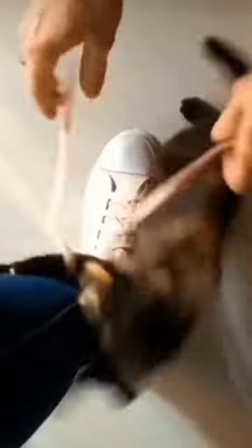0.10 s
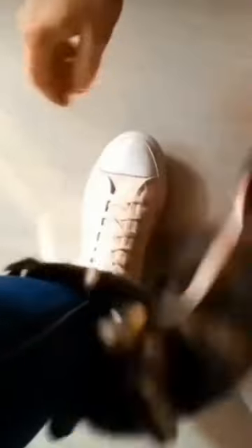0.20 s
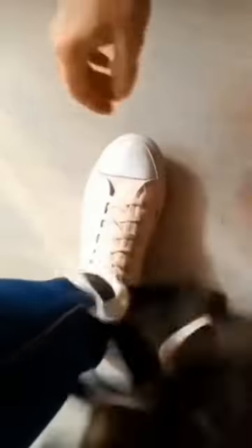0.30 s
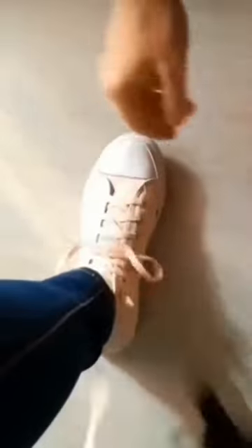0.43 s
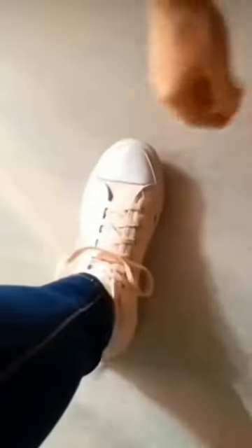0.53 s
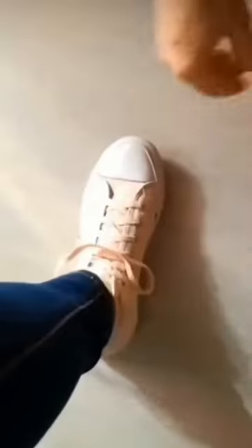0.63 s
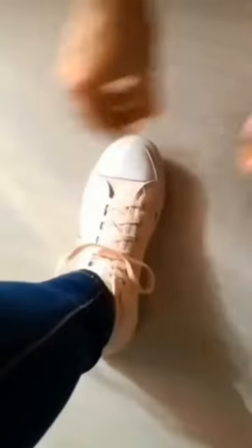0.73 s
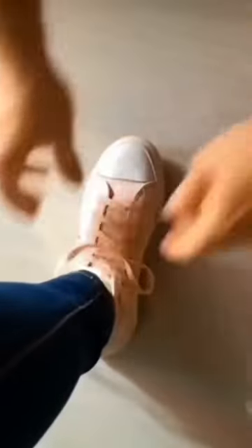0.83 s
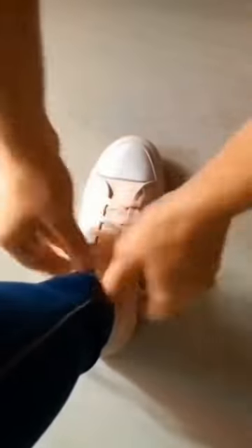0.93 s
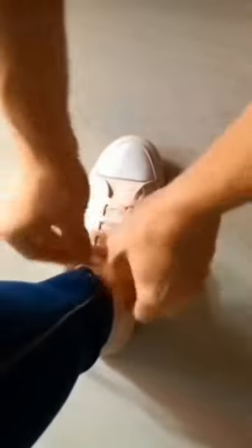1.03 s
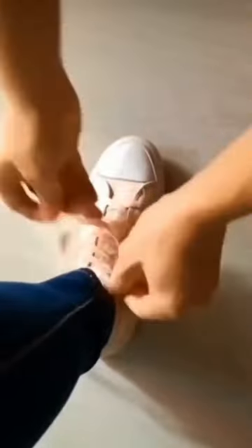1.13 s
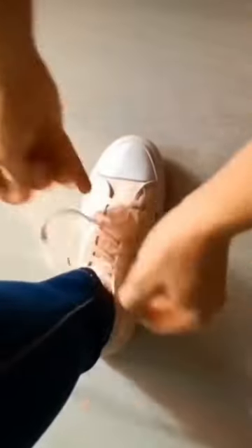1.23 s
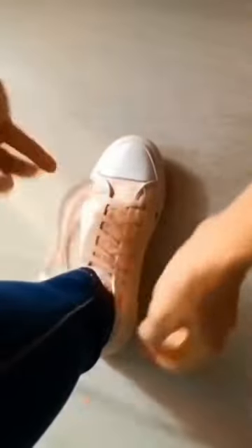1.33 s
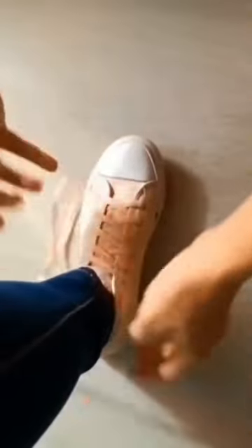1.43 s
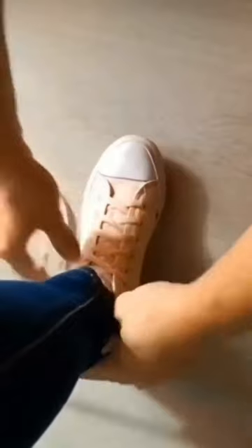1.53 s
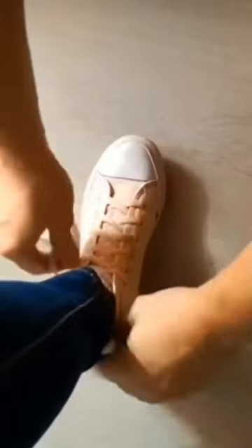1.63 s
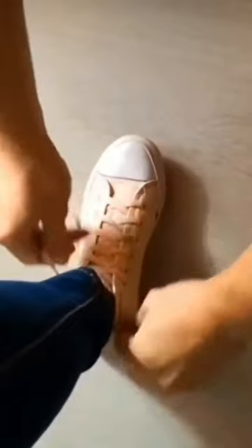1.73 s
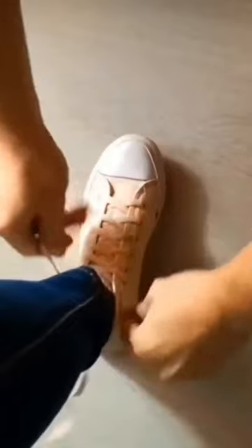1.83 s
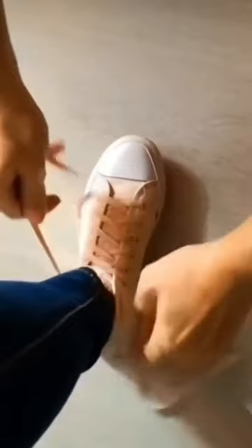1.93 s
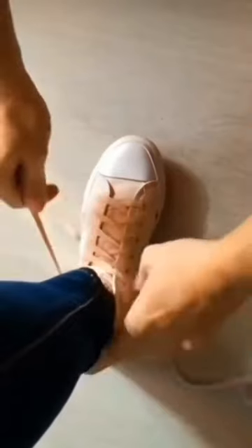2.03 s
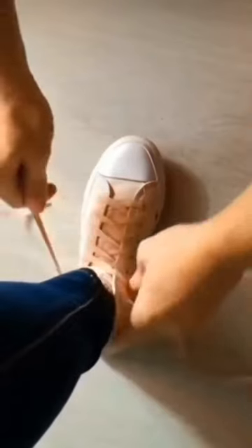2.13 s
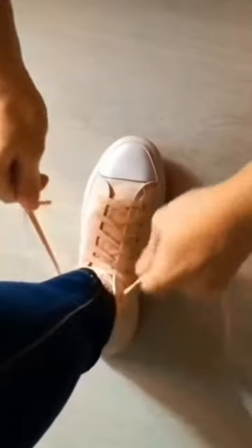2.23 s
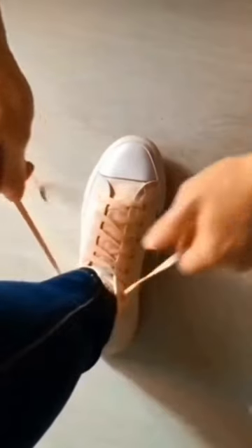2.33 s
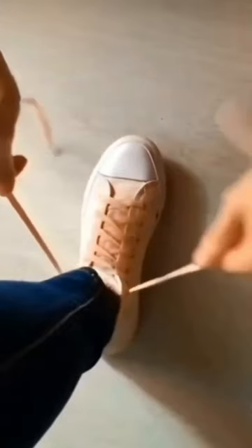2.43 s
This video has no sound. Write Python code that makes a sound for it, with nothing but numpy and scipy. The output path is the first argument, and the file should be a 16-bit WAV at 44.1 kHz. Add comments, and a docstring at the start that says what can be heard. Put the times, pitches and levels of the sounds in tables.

```python
"""First a low room rumble, a soft cloth rustle and a light rub; then hands work the laces of a canvas shoe.
It stands on a hard floor, close to the microphone. Rubs and scuffs are grainy clicks over hiss, shaped by filters.
Where they stick and slip they groan or squeak, as short wandering tones. Hollow knocks are damped resonances.
Near echoes and a small room's tail surround the shoe; the treble is dulled and the loudest peaks are clipped flat.
"""
import sys
import numpy as np
from scipy import signal
from scipy.fft import rfft, irfft
from scipy.io import wavfile

SR = 44100
rng = np.random.default_rng(int(sys.argv[2]) if len(sys.argv) > 2 else 0)


def wrap_up_sound(samples):
    """Save the sound to the file named by the first command line argument, as 16-bit audio."""
    columns = np.atleast_2d(samples).T
    # keep every value between -1 and 1, then stretch to whole-number steps
    tamed = np.clip(columns, -1, 1)
    steps = np.round(tamed * 32767).astype(np.int16)
    wavfile.write(sys.argv[1], SR, steps)


N = 110250   # samples: 2.5 s
TIME = np.arange(N) / SR
FREQS = np.maximum(np.arange(N // 2 + 1) * SR / N, 1)

# trouser leg, spectrum of the cloth: (frequency [Hz], level per Hz [dB])
CLOTH_SPECTRUM = [(100, -8.5), (200, 0.5), (400, -1.5), (520, -9), (1000, -12.5), (3000, -46)]
# trouser leg, its one movement: (start [s], rise [s], hold [s], release to -20 dB [s])
CLOTH_MOVE = (-.05, 0.0997, 0.7234, 0.142)
# rubs of lace and cloth; the release brings a fall of 20 dB, a negative pan leans right:
# (start [s], rise [s], hold [s], release [s], level [dB], low edge [Hz], high edge [Hz], pan [dB])
RUBS = [(-.04, 0.139, 0.088, 0.13, -23, 987, 5840, -8), (.208, 0.0104, 0.082, 0.0054, -18, 670, 5500, -5),
        (.306, 0.0202, 0.1128, .1, -5.5, 702, 6220, -2),
        (0.481, 0.0031, 0.0213, .12, -5.5, 950, 5920, -1.5),
        (0.554, 0.0145, 0.0285, 0.06, -12, 1870, 8800, -1),
        (.60, 0.0302, 0.1238, 0.0629, -20.5, 882, 6530, -1),
        (0.992, 0.0562, 0.0312, 0.1951, -28, 2665, 6500, -5.5),
        (1.119, 0.0992, 0.0696, 0.1277, -22, 1100, 6860, -6.5),
        (1.307, 0.0587, .02, .22, -25, 2880, 6920, -5),
        (1.576, 0.0051, 0.0256, 0.3051, -20.5, 1392, 2110, -3),
        (1.573, 0.0079, 0.084, 0.1949, -22.5, 3100, 6500, -1),
        (1.689, 0.049, 0.054, 0.2279, -21.2, 1500, 6130, -3),
        (1.927, 0.0098, .016, 0.18, -21.5, 2380, 6960, -3),
        (1.947, 0.0065, 0.0392, 0.107, -10, 2696, 7800, -2.5),
        (1.95, 0.0077, 0.0459, 0.1464, -20, 399, 2010, -0.5),
        (2.08, .17, .04, 0.1598, -21.8, 1600, 5000, -5), (2.333, 0.126, .06, 1.46, -31.5, 3360, 8550, -4.5)]
# spectrum of the rubs before their edges are cut: (frequency [Hz], level per Hz [dB])
RUB_SPECTRUM = [(150, -7.5), (500, -2.5), (1000, -0.5), (1800, 1.5), (3200, 0), (5000, 0.83), (7000, -3.5),
                (8500, -5), (10000, -7.5)]
# edges between the bands of friction that flutter on their own: (frequency [Hz])
FLUTTER_EDGES = (600, 1300, 2400, 4000, 6500)
# side against mid, how wide the sound is: (frequency [Hz], level [dB])
SIDE_LEVEL = [(100, -12.5), (300, -8), (600, -4), (1500, -7.5), (2500, -4.5), (5200, -.5), (7000, -3),
              (9000, -5.5)]
# spectrum of the room rumble: (frequency [Hz], level per Hz [dB])
RUMBLE_SPECTRUM = [(20, -3), (50, -2.5), (68, -6), (88, 4.5), (115, -7), (200, -9), (350, -17), (700, -26),
                   (1800, -21), (5000, -28), (9000, -36.5)]
# loudness of the rumble over time: (time [s], level [dB])
RUMBLE_LEVEL = [(0, -29), (.3, -27.5), (.72, -28), (.9, -35), (1.05, -35.5), (1.35, -33.5), (1.85, -31.5),
                (2.22, -38.5), (2.45, -32.5)]
# knocks of fingers and lace tips on the shoe: (time [s], peak level [dB], pitch [Hz], skid decay [s])
KNOCK_HITS = [(.111, -16.5, 1500, .005), (.2022, 2, 1800, 0.00227), (.2035, -7, 900, .006),
              (.318, -6, 818, 0.0045), (.384, -3, 951, 0.00385), (.482, 1.5, 1300, .007),
              (.482, -7, 331.7, 0.0059), (1.2078, -11.5, 720, .005), (1.213, -25, 1600, .03),
              (1.579, -16, 1600, 0.0058), (1.763, -17, 3900, .002), (1.9485, -9, 700, 0.0018),
              (1.949, -6, 1378, .002)]
# groans and squeaks where a rub sticks and slips; roughness is the pitch scatter as a share:
# (start [s], length [s], level [dB], pitch [Hz], roughness [0-1])
STICK_SLIPS = [(.212, .016, -20, 1720, .18), (0.381, .029, -9.5, 775, .05), (.427, .011, -10.5, 3000, .15),
               (0.493, .008, -4.5, 1006, .06), (0.514, 0.0401, -14, 965.1, .06),
               (.519, 0.0202, -16, 264.2, .1), (1.21, .04, -24.5, 750, .09),
               (1.322, 0.0408, -35, 860, 0.11), (1.572, .04, -23.5, 1750, .16),
               (1.803, 0.0434, -37, 780, .15), (1.929, .012, -20, 640, .17),
               (1.951, 0.00596, -4.5, 4686, 0.04)]
# scuffs that drive the hollow of the shoe; the release brings a fall of 20 dB:
# (start [s], rise [s], hold [s], release [s], level [dB])
SCUFF_PUSHES = [(0.317, 0.0041, 0.055, 0.1285, -16), (.376, 0.0088, 0.0376, 0.1337, -10),
                (.481, 0.00304, 0.0148, 0.1406, -6.5), (2.179, 0.064, 0.058, 0.26, -39.5)]
# spectrum of the hollow canvas shell: (frequency [Hz], level per Hz [dB])
SHELL_SPECTRUM = [(100, -10), (180, -4), (260, 0.5), (370, -7.5), (520, -9), (780, 1.5), (1000, 2),
                  (1300, -3), (2200, -9.5), (4000, -23), (9000, -43)]

CLOTH_DB = -31.5
RUB_LEAK_DB, SAG_DB_PER_S = -11, 11.5   # fibre noise below the low edge; a stroke slows as it goes
GRAINS_PER_S, GRAIN_SPREAD_DB, SMOOTH_DB = 1400, 3.5, -4   # clicks, their uneven size, the hiss with them
FLUTTER_DB, FLUTTER_HZ = 2, 45   # depth and fastest rate
ECHO_SPAN_S, ECHO_DB = .012, 4   # floor, leg and hands close by
PAN_DB_PER_OCTAVE, CENTRE_HZ = -2, 1100   # bright contacts lean to the right, dull ones to the left
RING_CYCLES = 13.2   # cycles to fall 60 dB: canvas damps fast
CONTACT_RISE_S, TAP_DB = 0.0013034, 15   # growth of the first brush; soft finger tap against the skid
# edges as a share of the pitch; a small spot radiates little below its resonance
KNOCK_LOW_RATIO, KNOCK_TOP_RATIO = 0.531, 1.45
SLIP_WANDER, SLIP_EDGE = 0.16023, 0.297   # wander rate as a share of pitch; rise and fall as a share of length
ROOM_T60_S, ROOM_DB, ROOM_DELAY_S = 0.306, -14.5, .01
DULL_ABOVE_HZ, FULL_SCALE, CUTOFF_HZ = 9976, 1.0, 15900   # full scale is the largest amplitude that passes


def from_db(db):
    """Turn decibels into a gain."""
    return 10 ** (np.asarray(db) / 20)


def rms_one(x):
    """Scale to an average strength (rms) of 1."""
    return x / np.sqrt(np.mean(x ** 2) + 1e-20)


def colour(x, points):
    """Shape a sound by a spectrum table."""
    hz, db = np.transpose(points)
    gain = from_db(np.interp(np.log(FREQS), np.log(hz), db))
    return irfft(rfft(x) * gain, N)


def cut(x, hz, kind, order=2):
    """Remove the lows ("high" pass) or the highs ("low" pass)."""
    sos = signal.butter(order, min(hz, SR * .45), kind, fs=SR, output="sos")
    return signal.sosfilt(sos, x)


def wander(hz):
    """Smooth random drift of spread 1, mostly slower than hz."""
    return rms_one(cut(rng.standard_normal(N), hz, "low"))


def panned(pan_db):
    """Left and right gains of unit mean power."""
    return rms_one(from_db([[pan_db / 2], [-pan_db / 2]]))


def placed(hz):
    """Left and right gains of a contact of this pitch."""
    return panned(PAN_DB_PER_OCTAVE * np.log2(hz / CENTRE_HZ))


def widen(pair):
    """Two unrelated sounds become mid and side; the bass is nearly alike on both sides."""
    mid, side = pair[0], colour(pair[1], SIDE_LEVEL)
    return mid + side * np.array([[1], [-1]])


def envelope(start, rise, hold, release):
    """A hand speeds up, slows a little, then lets go."""
    t = TIME - start
    speed_up = np.clip(t / max(rise, 1e-3), 0, 1)
    sag_db = SAG_DB_PER_S * np.maximum(t - rise, 0)
    release_db = 20 * np.maximum(t - rise - hold, 0) / release
    return speed_up * from_db(-sag_db - release_db)


def near_echoes(x, count=12):
    """Close surfaces send back short echoes that colour each of two sounds in its own way."""
    out = x.copy()
    echo_gain = from_db(ECHO_DB) / np.sqrt(count)
    for ch in range(2):
        for share, sign in zip(rng.uniform(.05, 1, count), rng.choice([-1, 1], count)):
            lag = 1 + int(share * ECHO_SPAN_S * SR)
            out[ch, lag:] += sign * echo_gain * x[ch, :-lag]
    return out


def friction():
    """Threads catch and slip: uneven clicks over a smooth hiss, changing colour with the grip."""
    catches = rng.random((2, N)) < GRAINS_PER_S / SR
    signs = rng.choice([-1, 1], (2, N))
    sizes = from_db(GRAIN_SPREAD_DB * np.minimum(rng.exponential(1, (2, N)), 5))
    hiss = from_db(SMOOTH_DB) * rng.standard_normal((2, N))
    grain = rfft(near_echoes(rms_one(catches * signs * sizes) + hiss))
    band, out = np.searchsorted(FLUTTER_EDGES, FREQS), 0
    for k in range(len(FLUTTER_EDGES) + 1):
        flutter = from_db(FLUTTER_DB * wander(FLUTTER_HZ))
        out = out + irfft(grain * (band == k), N) * flutter
    return widen(out)


def trouser_leg():
    """Heavy cloth moves with a soft, low rustle of rubbing threads."""
    start, rise, hold, release = CLOTH_MOVE
    speed_up = np.clip((TIME - start) / rise, 0, 1)
    let_go = from_db(-20 * np.maximum(TIME - start - rise - hold, 0) / release)
    return from_db(CLOTH_DB) * speed_up * let_go * rms_one(colour(friction(), CLOTH_SPECTRUM))


def laces():
    """Each stroke sounds between its own edges: a firm grip is lower, a light slide is thinner."""
    rub, out = colour(friction(), RUB_SPECTRUM), 0
    for start, rise, hold, release, db, low_hz, high_hz, pan_db in RUBS:
        rub = np.roll(rub, SR // 2, axis=1)   # a fresh stretch of lace
        body = cut(rub, low_hz, "high", order=4)
        # played backwards, so that the leak does not match the body
        leak = from_db(RUB_LEAK_DB) * cut(rub[:, ::-1], low_hz / 2, "high", order=1)
        sound = rms_one(cut(body + leak, high_hz, "low", order=2))
        out = out + from_db(db) * panned(pan_db) * envelope(start, rise, hold, release) * sound
    return out


def rumble():
    """Low room noise with one boomy resonance and a faint hiss."""
    noise = colour(widen(rng.standard_normal((2, N))), RUMBLE_SPECTRUM)
    level = from_db(np.interp(TIME, *np.transpose(RUMBLE_LEVEL)))
    return level * rms_one(noise)


def knocks():
    """A brush, a soft tap and a dying skid drive one well-damped resonance of the spot that is hit."""
    out = 0
    for s, db, hz, skid_s in KNOCK_HITS:
        t = TIME - s - CONTACT_RISE_S   # zero at the tap
        force = rng.standard_normal(N) * np.exp(-np.abs(t) / np.where(t < 0, CONTACT_RISE_S, skid_s))
        force[int((s + CONTACT_RISE_S) * SR)] += from_db(TAP_DB)
        # two-pole resonator: r sets the damping, w the pitch
        r, w = from_db(-60 * hz / (RING_CYCLES * SR)), 2 * np.pi * hz / SR
        ring = signal.lfilter([1, 0, -1], [1, -2 * r * np.cos(w), r * r], force + 1e-18)
        ring = cut(ring, KNOCK_TOP_RATIO * hz, "low", order=4)
        ring = cut(ring, KNOCK_LOW_RATIO * hz, "high", order=3)
        out = out + from_db(db) * placed(hz) * ring / np.abs(ring).max()
    return out


def slips():
    """Sticking and slipping locks briefly onto one resonance; the rougher it is, the more its pitch scatters."""
    out = 0
    for start, length, db, hz, rough in STICK_SLIPS:
        along = (TIME - start) / length
        grip = np.clip(along / SLIP_EDGE, 0, 1) * np.exp(-np.maximum(along - 1, 0) / SLIP_EDGE)
        pitch = hz * (1 + rough * wander(SLIP_WANDER * hz))
        strength = 1 + .5 * wander(SLIP_WANDER * hz)
        judder = np.sin(2 * np.pi * np.cumsum(pitch) / SR) * strength
        out = out + from_db(db) * placed(hz) * grip * rms_one(judder)
    return out


def scuffs():
    """Hard rubbing booms in the canvas shell."""
    push = 0
    for start, rise, hold, release, db in SCUFF_PUSHES:
        push = push + from_db(db) * envelope(start, rise, hold, release)
    return push * rms_one(colour(friction(), SHELL_SPECTRUM))


def room(x):
    """Many reflections blur into a short fading tail, unrelated on the two sides."""
    t = TIME[:SR // 2]
    tail = rng.standard_normal((2, len(t))) * from_db(-60 * t / ROOM_T60_S) * (t > ROOM_DELAY_S)
    tail /= np.sqrt(np.sum(tail ** 2, axis=1, keepdims=True))
    return from_db(ROOM_DB) * signal.fftconvolve(x, tail, axes=1)[:, :N]


def scene():
    """Cloth, rubs, knocks, slips and scuffs in the room, with the rumble underneath."""
    shoe = trouser_leg() + laces() + knocks() + slips() + scuffs()
    return shoe + room(shoe) + rumble()


def record(dry):
    """A low-pass near 10 kHz dulls the sound; peaks above full scale are clipped flat, and the top is cut."""
    low_pass = signal.butter(16, DULL_ABOVE_HZ, fs=SR, output="sos")
    dulled = signal.sosfiltfilt(low_pass, dry)
    clipped = np.clip(dulled, -FULL_SCALE, FULL_SCALE)
    top_cut = signal.ellip(10, .1, 80, CUTOFF_HZ, fs=SR, output="sos")
    return signal.sosfilt(top_cut, clipped)


dry = scene()
out = record(dry)
wrap_up_sound(out)
```